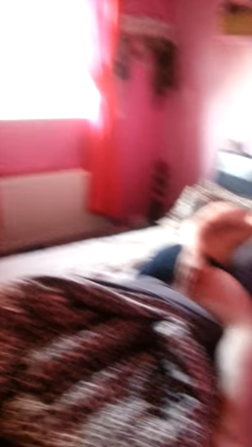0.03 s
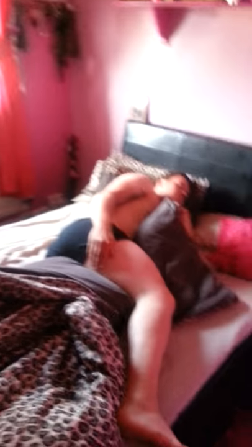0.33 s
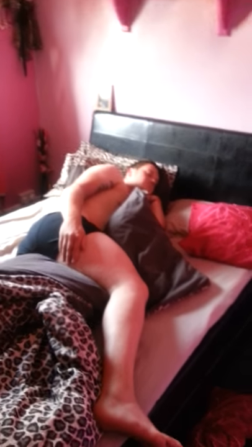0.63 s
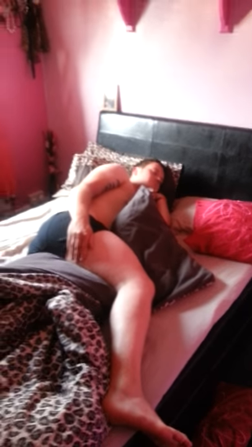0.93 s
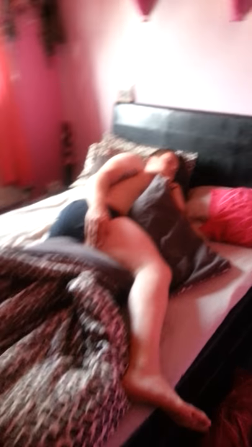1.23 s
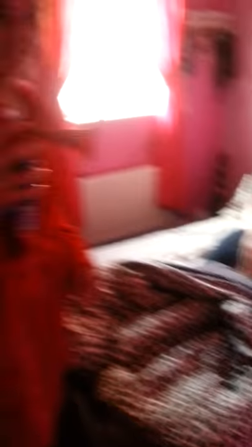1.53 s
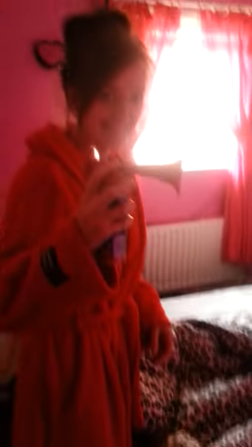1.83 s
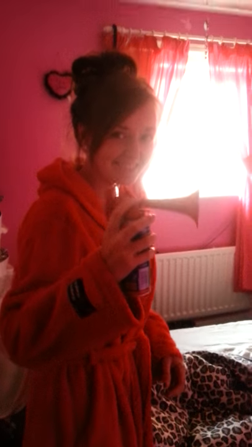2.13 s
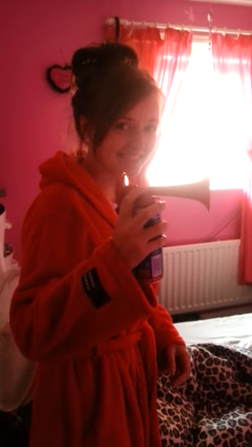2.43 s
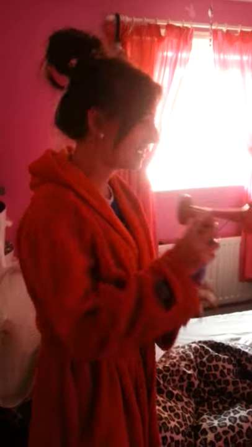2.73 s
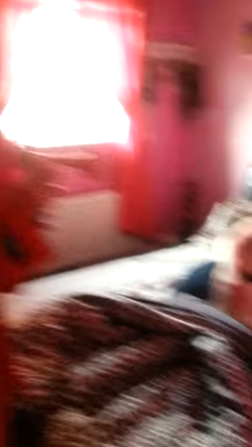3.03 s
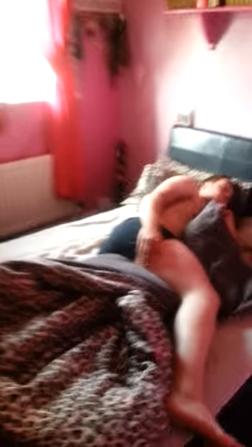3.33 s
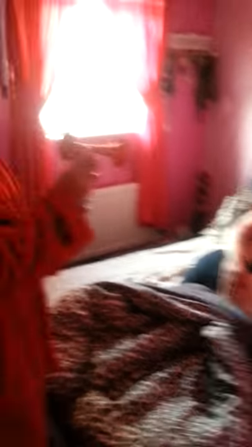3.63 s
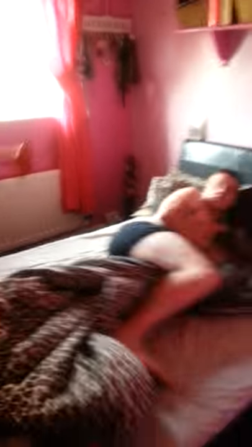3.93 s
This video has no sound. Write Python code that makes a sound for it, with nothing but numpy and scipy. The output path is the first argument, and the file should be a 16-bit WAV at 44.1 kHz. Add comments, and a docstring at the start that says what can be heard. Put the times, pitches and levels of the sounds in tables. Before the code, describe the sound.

An air horn blast comes after a long wait in a small bedroom. For the first 3.5 seconds there is only steady room hiss, with faint handling ticks around 1.4, 2.5 and 3.5 seconds. At about 3.6 seconds the horn fires nearby with rushing gas, starting high and quickly sagging to a held note. It distorts the phone microphone, dips in level and is still sounding at 4 seconds.

```python
"""First comes the steady hiss of a small bedroom, picked up loudly by a phone, with three faint ticks.
Near the end a canister air horn is fired a few steps away. Gas leaks out and shakes a thin disc, the
diaphragm, which starts too high and sags to its note. The walls echo that slide, and the blast
overloads both microphones until the phone has turned its own level down."""
import sys
import numpy as np
from scipy import signal
from scipy.fft import rfft, irfft, next_fast_len
from scipy.io import wavfile
from scipy.ndimage import uniform_filter1d

SR = 44100
rng = np.random.default_rng(int(sys.argv[2]) if len(sys.argv) > 2 else 0)


def to_wav(sig):
    """Store sig (one row per channel, or 1-D mono) as 16-bit WAV at the path in sys.argv[1].

    Samples outside -1..1 are clipped; the rate is SR.
    """
    pcm = np.clip(np.atleast_2d(sig), -1, 1) * 32767
    pcm = np.round(pcm).astype(np.int16)
    wavfile.write(sys.argv[1], SR, pcm.T)  # frames by channels


N = 176400
T = np.arange(N) / SR

# How the blast unfolds. Harmonics are the tones at 1, 2, 3... times the horn's pitch.
# Columns: time_s, tone_level_db, second_harmonic_extra_db, higher_harmonics_extra_db, gas_level_db
BLAST = [(3.5, -64, -30, -30, -60), (3.553, -34, -25, -21, -30), (3.563, -4.5, -26, -19, -31),
         (3.573, 12.5, -5.5, -13, -14), (3.6, 10.5, 0.5, 2, -4.5), (3.64, 9, 4, 3, -3),
         (3.7, 9.5, 4.5, 1.5, -15), (3.738, 8.5, 7, 3.5, -13), (3.77, 7.5, 0, 6, -7),
         (3.83, 8.5, 0, 5.5, -3.5), (3.875, 14.5, 2.5, -1.5, -9), (3.905, 17, -0.5, -5, -8),
         (3.93, 12.5, -9, -1.5, -12), (3.96, 14.5, -10, -4, -13), (4.0, 11, -8, -1, -5)]


def amp(db):
    """Turn decibels into a factor to multiply by."""
    return 10 ** (np.asarray(db) / 20)


def unit(x):
    """Scale a signal to an average power of 1."""
    return x / np.sqrt(np.mean(x ** 2) + 1e-20)


def over_time(table, column=1):
    """One column of a table, filled in for every sample."""
    columns = np.transpose(table)
    return np.interp(T, columns[0], columns[column])


def over_hz(table, hz):
    """A table's value columns, filled in at the given frequencies."""
    table_hz, *columns = np.transpose(table)
    return np.array([np.interp(np.log(hz + 1), np.log(table_hz), c) for c in columns])


def wander(rate_hz, size=N):
    """A smooth random wobble, up to about the given rate."""
    n = next_fast_len(size)
    keep_slow = np.exp(-(np.fft.rfftfreq(n, 1 / SR) / rate_hz) ** 2)
    return unit(irfft(rfft(rng.standard_normal(n)) * keep_slow, n))[:size]


def hiss(spectrum):
    """Shaped noise at two microphones, which hear much the same bass."""
    # How alike the two sides are. Columns: frequency_hz, likeness (1 = the same)
    side_likeness = [(60, 0.56), (130, 0.83), (290, 0.92), (640, 0.65), (1390, 0.067), (3060, 0.11),
                     (6720, -0.022), (14800, 0.055)]
    hz = np.fft.rfftfreq(N, 1 / SR)
    left, separate = rfft(rng.standard_normal((2, N)))
    likeness = np.clip(over_hz(side_likeness, hz)[0], -1, 1)
    right = likeness * left + np.sqrt(1 - likeness ** 2) * separate
    return unit(irfft(np.array([left, right]) * amp(over_hz(spectrum, hz)), N))


def room_air(level_db=-34.5, flutter_db=0.78, split_hz=1800):
    """The bedroom's steady hiss; bass and treble drift a little as the phone turns."""
    # Tone colour of the hiss. Columns: frequency_hz, left_db, right_db
    air_colour = [(20, -39, -42), (42, -35, -39), (58, -29, -23), (80, -34, -33), (117, -28, -30),
                  (164, -11, -13), (198.6, -15, -17.5), (243.5, -3.5, -3), (297, -8.5, -15.5), (392, -1, 0),
                  (466, -10, -10.5), (528, -5, -5.5), (990, -8.5, -11), (1590, -9.5, -15),
                  (2250, -8.5, -20.5), (3600, -15, -23), (4560, -22, -23.5), (6050, -31, -31),
                  (8200, -30.5, -33), (9700, -38, -35.5), (14400, -41.5, -40), (15300, -60, -62)]
    # Its slow drift. Columns: time_s, bass_db, treble_db
    drift = [(0, 1.9, 1.5), (.3, 0, -0.5), (.6, 1.8, -1), (.8, -0.5, -2), (1.3, -0.6, -1.5),
             (1.65, -0.5, -0.4), (1.85, 0, 1.5), (2.3, 0.9, 0.5), (2.6, 1.7, .5), (3.15, 1, 1.3),
             (3.5, 1, 1)]
    air = hiss(air_colour) * amp(level_db + flutter_db * wander(rate_hz=9))
    bass = signal.sosfiltfilt(signal.butter(2, split_hz, fs=SR, output="sos"), air)
    treble = air - bass
    return bass * amp(over_time(drift)) + treble * amp(over_time(drift, column=2))


def handling_ticks(pitch_hz=2900, fade_s=0.003):
    """Handling makes tiny, dull plastic ticks, mostly on the left."""
    # One row per tick. Columns: peak_time_s, relative_level_db
    ticks = [(1.434, -23.5), (2.523, -32), (3.469, -34)]
    band = signal.butter(2, [pitch_hz * 0.75, pitch_hz * 1.03], "band", fs=SR, output="sos")
    noise = unit(signal.sosfilt(band, rng.standard_normal((2, N))))
    loudness = sum(amp(db - 6.5) * np.exp(-abs(T - time_s) / fade_s) for time_s, db in ticks)
    return noise * loudness * amp([[2], [-6]])


def escaping_gas(right_db=-2):
    """Gas rushes through the valve, beginning just before the note."""
    # Tone colour of the rush. Columns: frequency_hz, level_db
    gas_colour = [(30, -42), (200, -30), (600, -13), (2200, 2), (4500, -9), (8000, -21), (15000, -35)]
    return hiss(gas_colour) * amp(over_time(BLAST, column=4)) * amp([[0], [right_db]])


def horn(start_s=3.5, swell_db=2.5, swell_hz=19.7):
    """The diaphragm starts with an almost pure tone, then slaps shut once a cycle, adding harmonics."""
    # The diaphragm's sagging note. Columns: time_s, pitch_hz
    slide = [(3.55, 780), (3.571, 724), (3.585, 680), (3.6, 648.5), (3.625, 612), (3.655, 590.6),
             (3.7, 572.2), (3.745, 560), (3.78, 555.3), (3.82, 554.8), (3.885, 562.4), (3.93, 561.4),
             (4.0, 554.9)]
    # The horn's tone colour at each microphone. Columns: frequency_hz, left_db, right_db
    horn_colour = [(560, -1.5, 0), (1110, -0.5, -6.5), (1750, -4.5, -8), (2220, -6, -14.5), (2770, -2, -9),
                   (3430, -14.5, -22), (4460, -31.5, -24.5), (6000, -35, -33), (8000, -47, -48),
                   (14000, -59, -68)]
    # Rise and fall of the lowest harmonic, on the left only. Columns: time_s, extra_db
    lowest_left = [(3.62, 0.5), (3.66, -4), (3.7, 4.5), (3.735, 3.5), (3.775, -5), (3.84, 0.5), (3.875, -1),
                   (3.91, 2), (4.0, 3.5)]
    sounding = T >= start_s
    # The pitch trembles by this fraction, most around 3.6 s, before the diaphragm settles.
    tremble = 0.0024 + 0.007 * np.exp(-((T - 3.6) / 0.035) ** 2)
    pitch_hz = (over_time(slide) * (1 + tremble * wander(rate_hz=160)))[sounding]
    phase = 2 * np.pi * np.cumsum(pitch_hz) / SR
    first_db = np.outer([1, 0], over_time(lowest_left)[sounding])
    second_db = over_time(BLAST, column=2)[sounding]
    higher_db = over_time(BLAST, column=3)[sounding]
    tone = np.zeros((2, N))
    for k in range(1, 21):
        # Higher harmonics swell and fade as the phone moves through the room's loud and quiet spots.
        swell = np.array([wander(swell_hz, size=len(pitch_hz)) for side in "LR"])
        extra_db = first_db if k == 1 else second_db if k == 2 else higher_db + swell_db * swell
        tone[:, sounding] += amp(over_hz(horn_colour, k * pitch_hz) + extra_db) * np.sin(k * phase)
    return tone * amp(over_time(BLAST))


def bedroom(sound, tail_db=-15, fade_s=0.3, gap_s=0.012):
    """Sound arrives directly, then off the near walls, then as a short blur of echoes."""
    # First echoes off the walls. Columns: left_delay_ms, right_delay_ms, left_gain, right_gain
    echoes = [(9.42, 5.1, 0.32, 0.67), (9.987, 9.42, 0.36, 0.56), (13.947, 12.72, 0.39, 0.29),
              (32.17, 29.52, 0.15, 0.38), (34.67, 30.66, 0.2, 0.52), (35.88, 31.8, .25, .25),
              (36.89, 34.68, 0.26, 0.37)]
    t = T[:SR // 2]
    tail = rng.standard_normal((2, len(t))) * amp(-60 * t / fade_s) * (t > gap_s)
    tail *= amp(tail_db) / np.linalg.norm(tail, axis=1, keepdims=True)
    size = next_fast_len(N + SR)
    khz = np.fft.rfftfreq(size, 1000 / SR)
    walls = 0
    for echo in echoes:
        delay = np.exp(-2j * np.pi * np.outer(echo[:2], khz))
        walls += np.array(echo[2:])[:, None] * delay
    return irfft(rfft(sound, size) * (1 + walls + rfft(tail, size)), size)[:, :N]


def overload(sound, ceiling=0.9, sharpness=12):
    """Peaks too big for the phone are flattened, which sounds harsh."""
    fine = signal.resample_poly(sound, 3, 1, axis=1)  # finer time steps reduce stray tones
    flattened = ceiling * fine / (1 + abs(fine) ** sharpness) ** (1 / sharpness)
    return signal.resample_poly(flattened, 1, 3, axis=1)


def scene():
    """Everything that reaches the two microphones."""
    return bedroom(horn()) + escaping_gas() + room_air() + handling_ticks()


def record(dry):
    """The phone turns down while the sound is too loud, flattens peaks and cuts the highest treble."""
    too_loud_db, fall_db_per_s, cutoff_hz = -10, 62.5, 15400
    power = uniform_filter1d((dry ** 2).mean(0), size=200)
    too_loud = power > amp(too_loud_db) ** 2
    gain = amp(-fall_db_per_s * np.cumsum(too_loud) / SR)
    treble_cut = signal.firwin(255, cutoff_hz, window=("kaiser", 7), fs=SR)
    return signal.oaconvolve(overload(dry * gain), treble_cut[None], "same")


dry = scene()
out = record(dry)
to_wav(out)
```